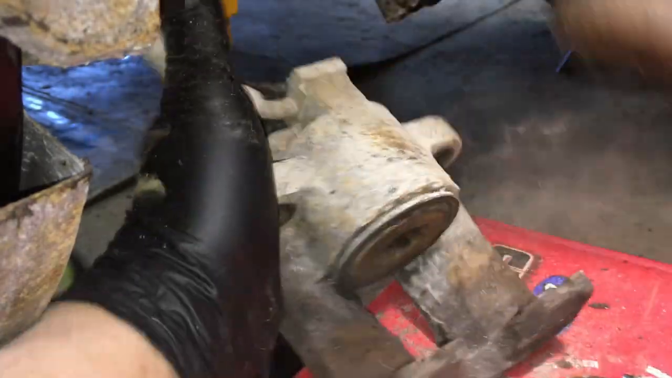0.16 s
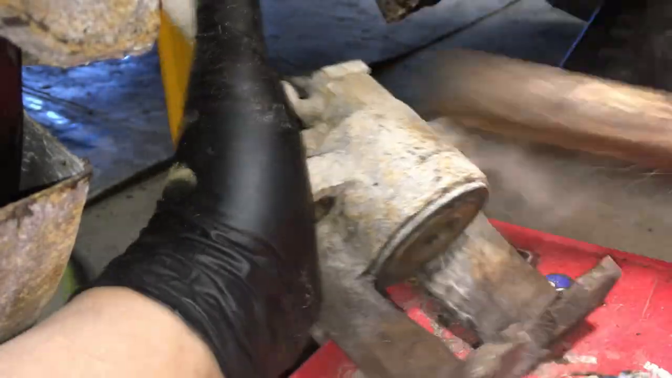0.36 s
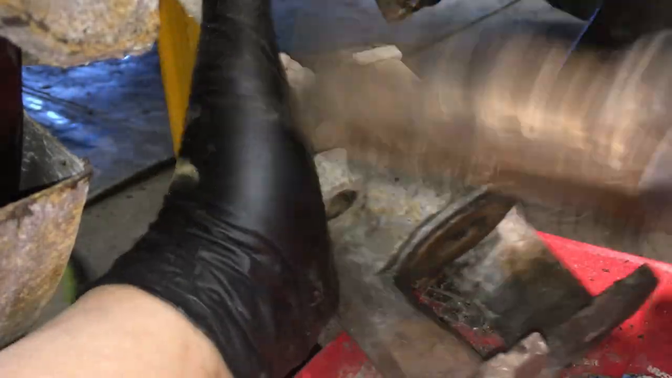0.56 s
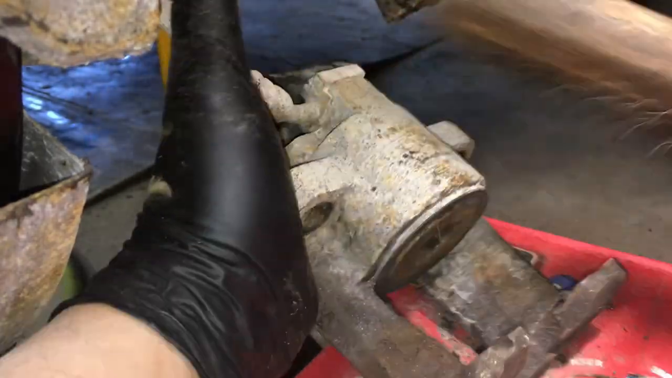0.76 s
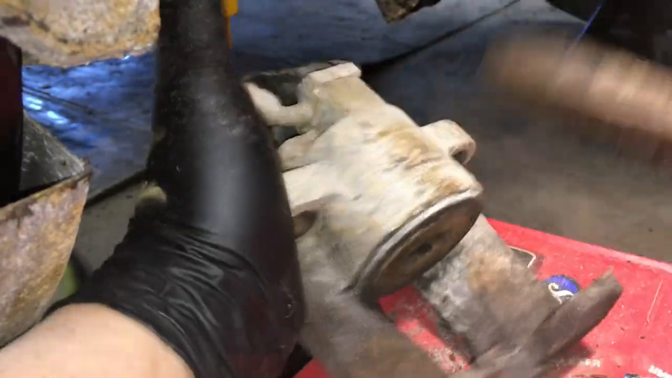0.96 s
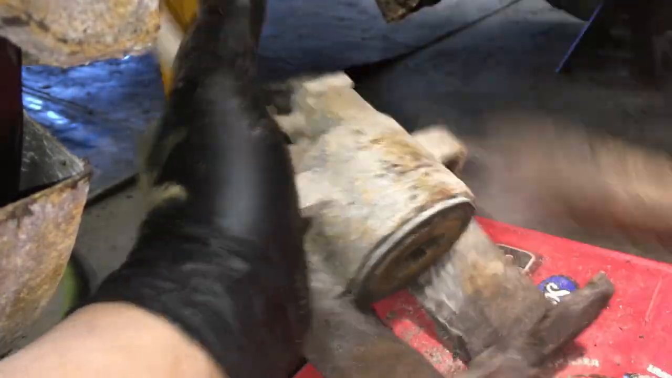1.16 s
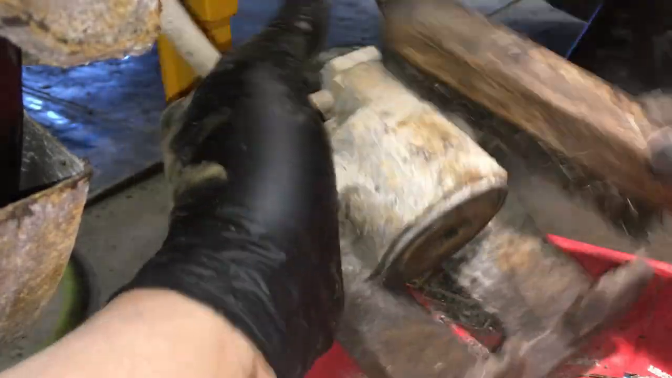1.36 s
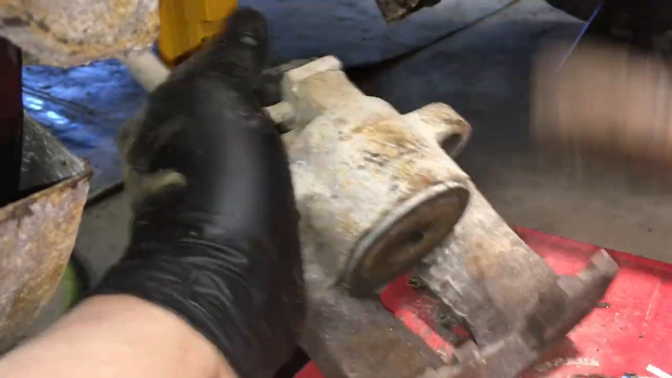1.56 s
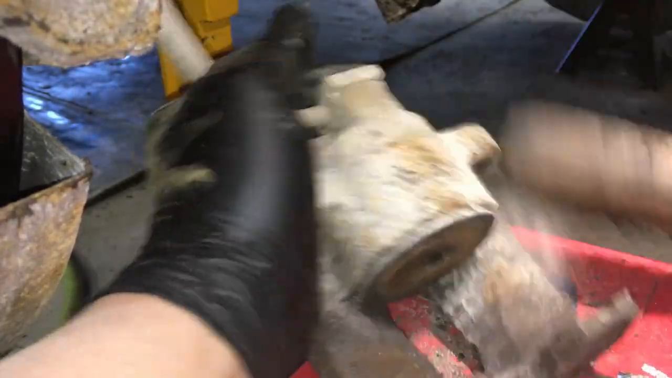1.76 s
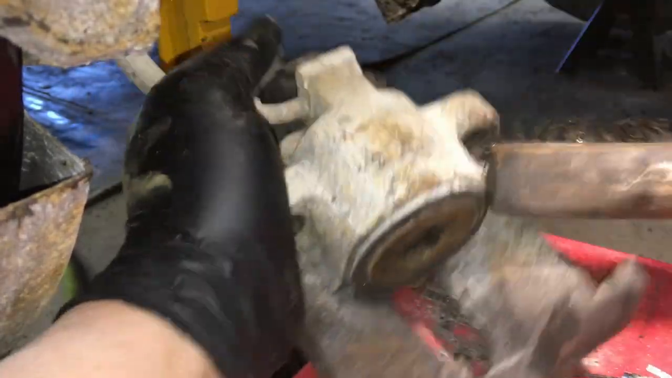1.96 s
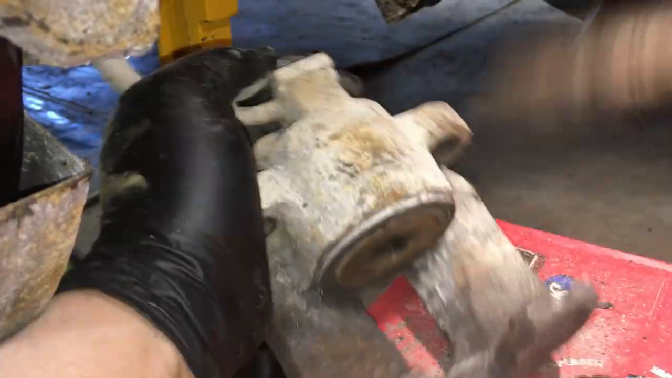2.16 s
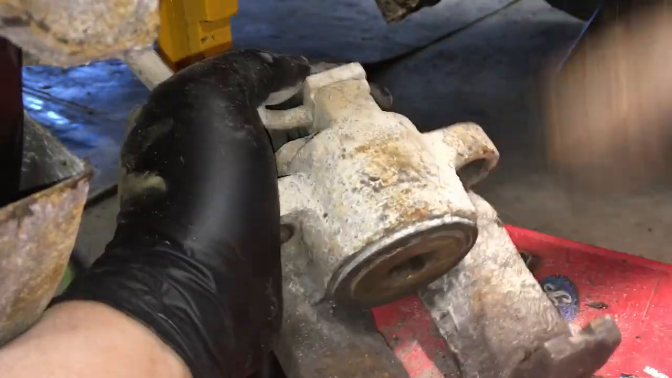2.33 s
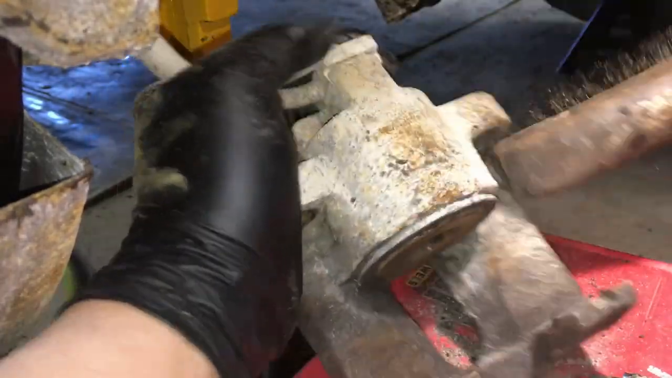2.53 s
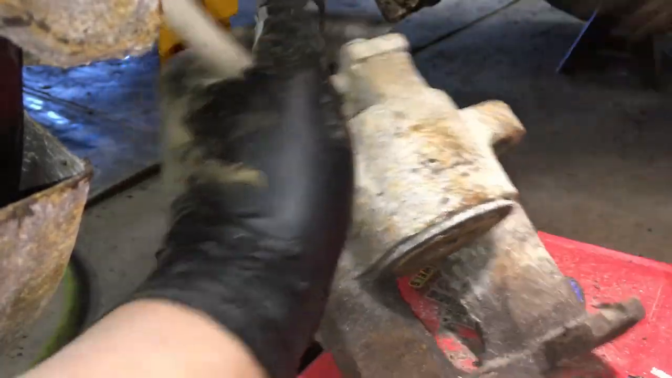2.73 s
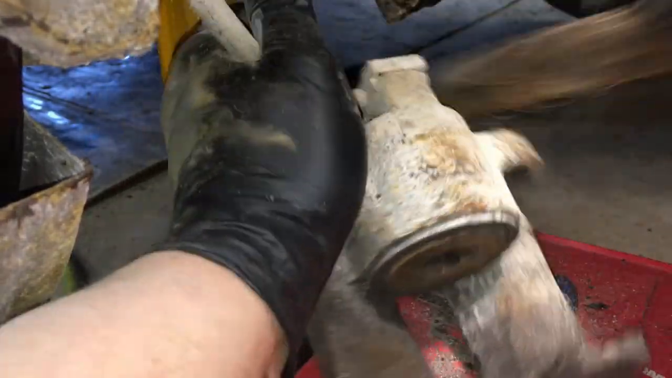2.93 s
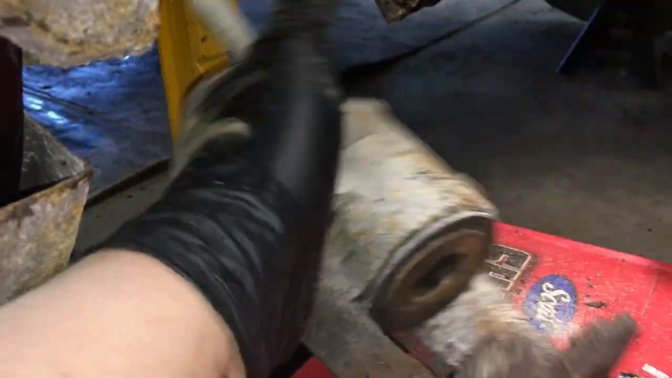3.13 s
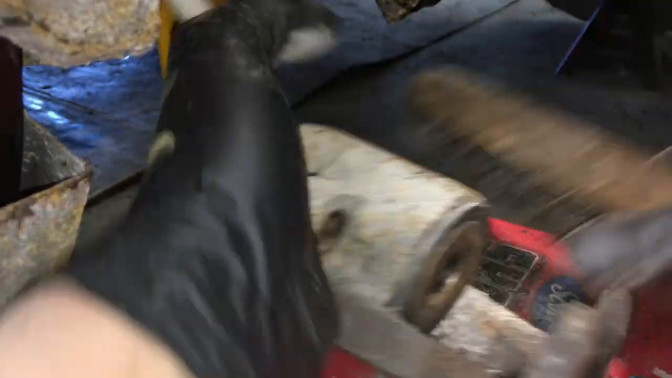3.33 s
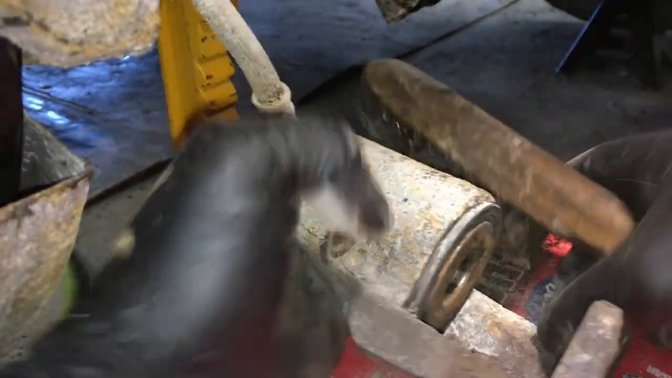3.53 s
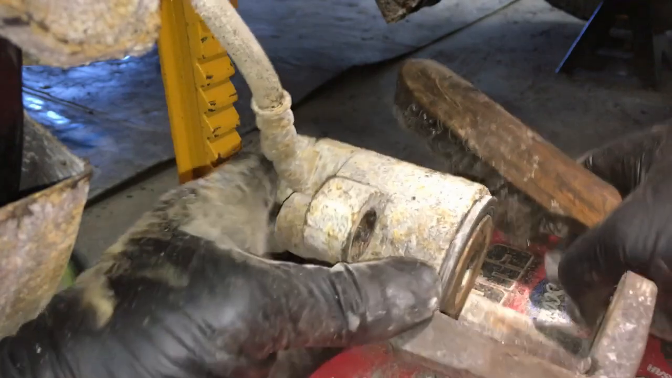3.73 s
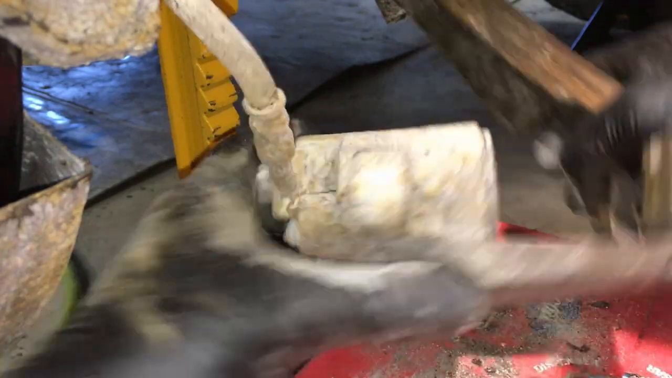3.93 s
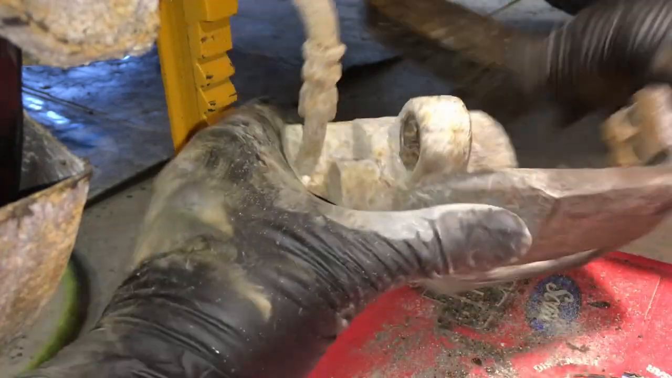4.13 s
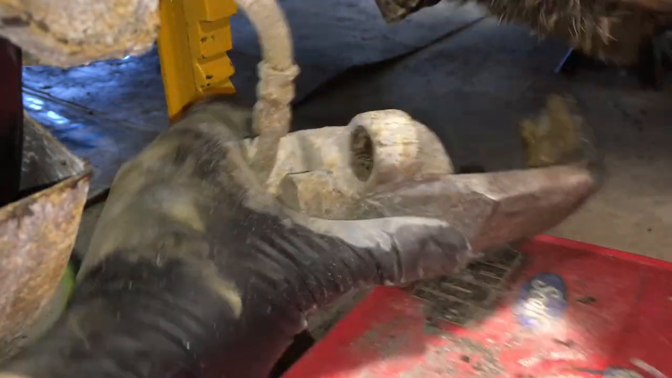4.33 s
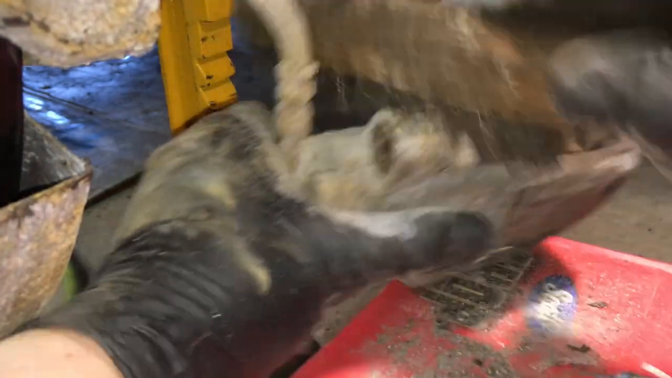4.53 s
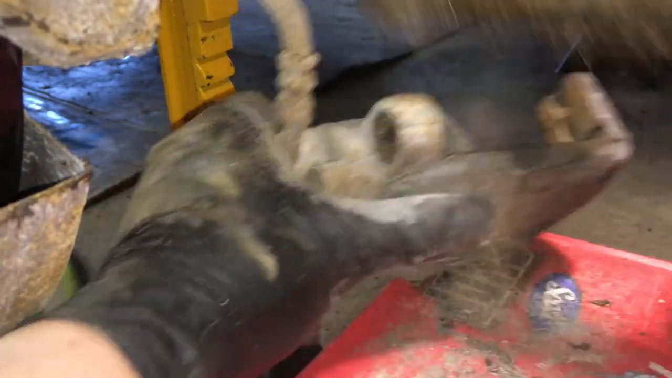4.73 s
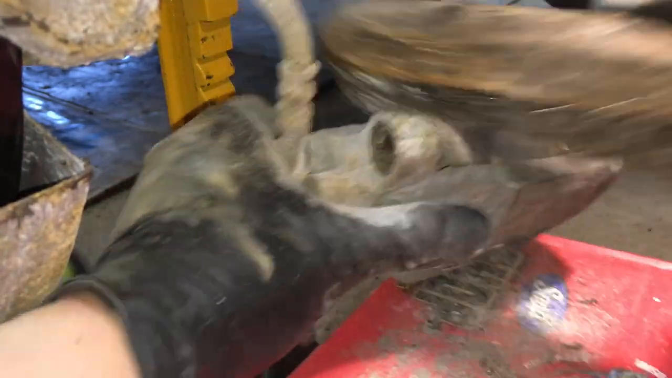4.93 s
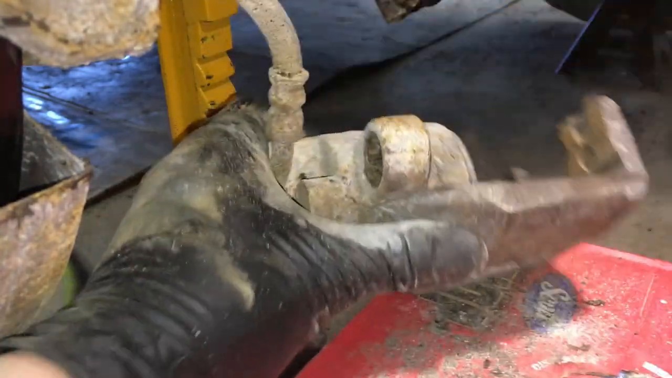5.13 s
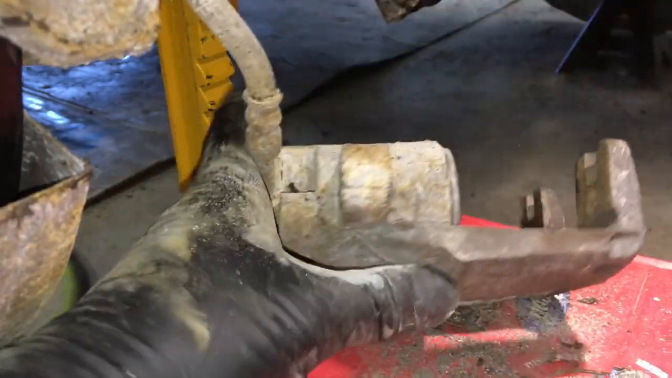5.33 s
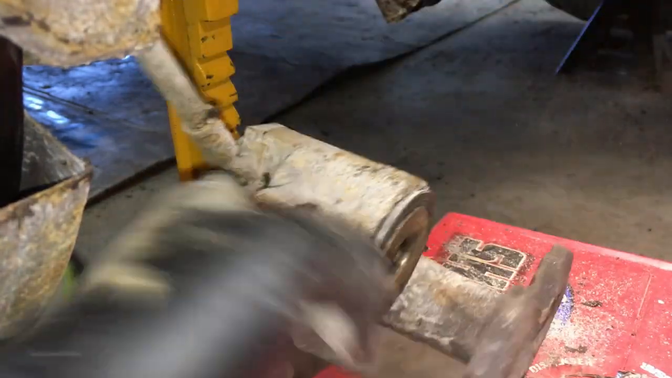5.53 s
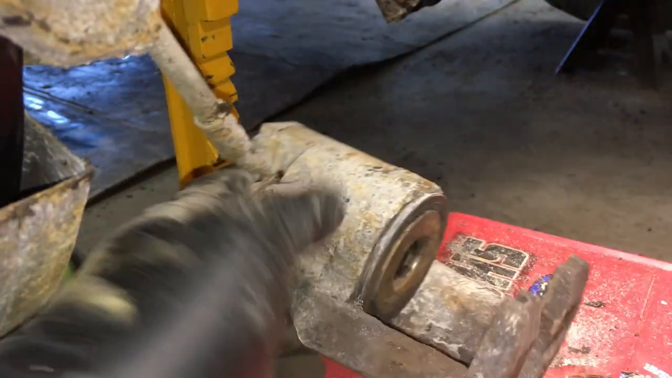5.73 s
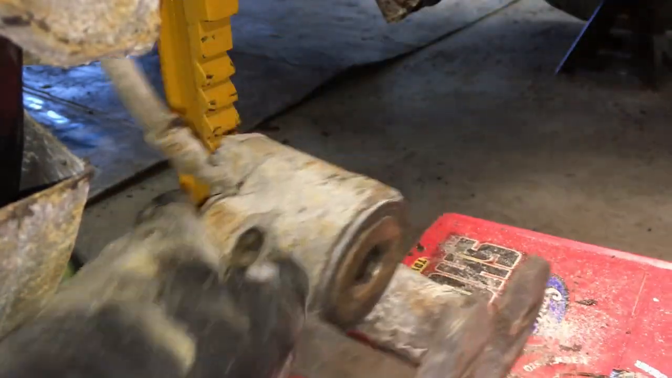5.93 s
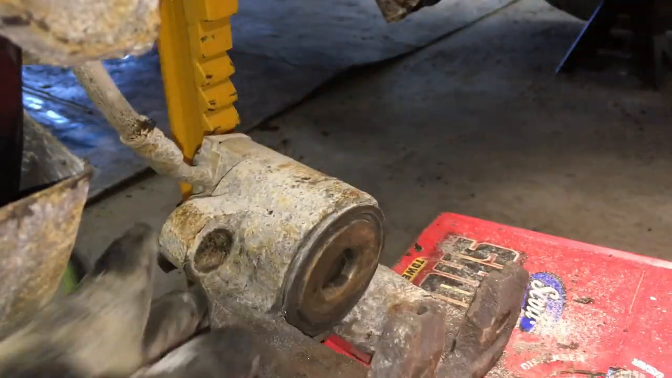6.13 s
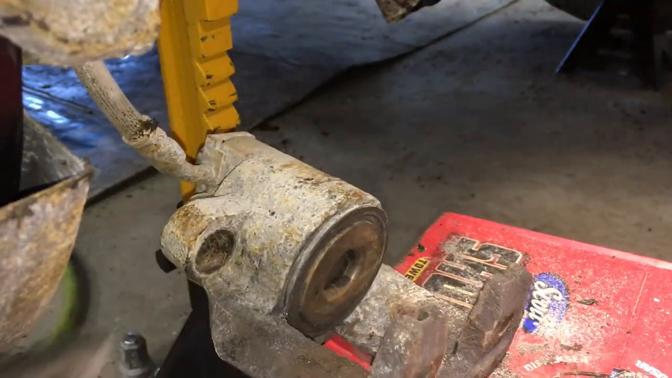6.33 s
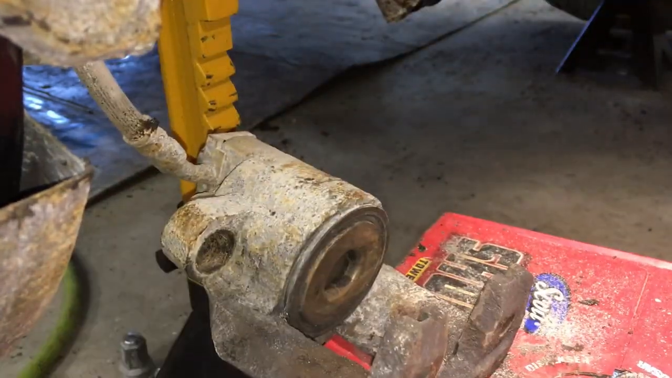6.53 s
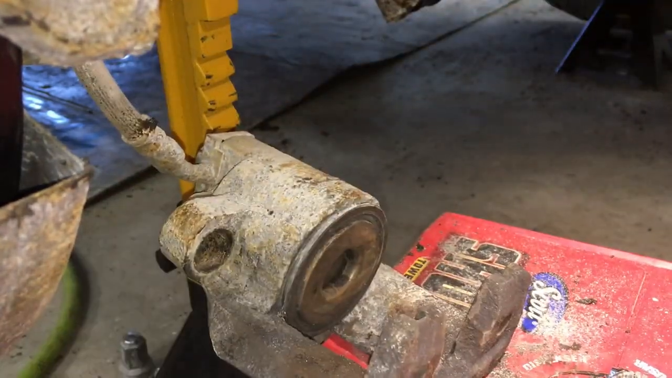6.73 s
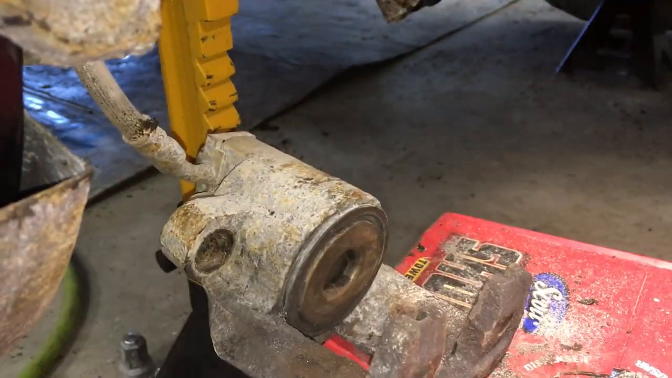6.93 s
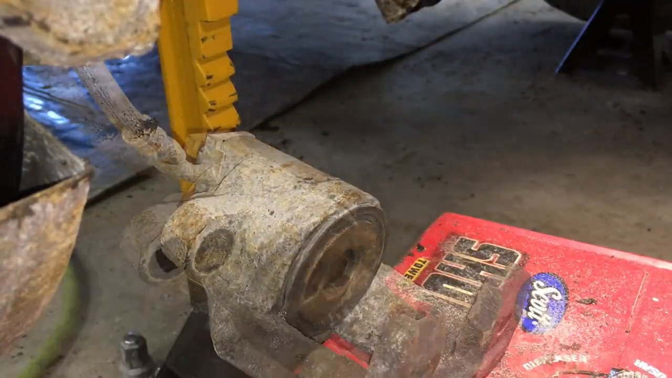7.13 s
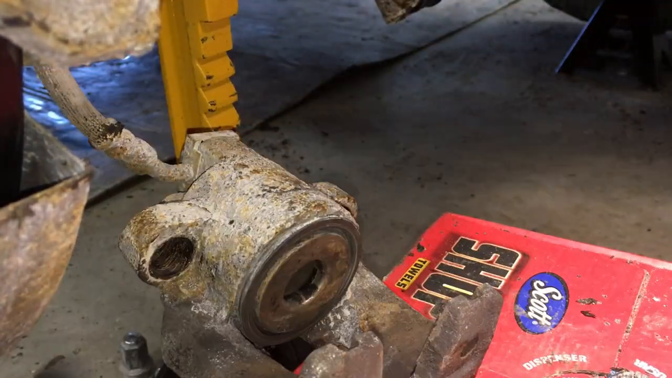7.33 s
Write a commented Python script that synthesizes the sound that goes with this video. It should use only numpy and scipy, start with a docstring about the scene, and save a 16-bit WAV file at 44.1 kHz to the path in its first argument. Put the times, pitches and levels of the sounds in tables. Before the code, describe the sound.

Close by in a garage, a steel wire brush scrubs a rusty brake caliper in quick, uneven strokes. The bristles rasp, snap and zing while the wooden back knocks dully on the metal. A rubber glove turns the part with gritty rubbing and clicks, the brush makes a few more passes, and the glove rubs again before fading. Low handling rumble sits underneath.

```python
"""In a garage, close by, a steel wire brush scrubs a rusty brake caliper that hangs from its hose.
Friction is a train of tiny impacts: bristles rasp, snap and zing over the rust, and the wooden back of
the brush excites the damped modes of the casting. A rubber glove turns the part by stick and slip, the
brush passes again, and the glove handles the part once more, with a faint thin ring under the rubbing.
Low handling rumble on the microphone swells after each knock; the room adds a short reverberation."""
import sys
import numpy as np
from scipy import signal
from scipy.fft import rfft, irfft
from scipy.io import wavfile
from scipy.ndimage import uniform_filter1d

SR = 44100
rng = np.random.default_rng(int(sys.argv[2]) if len(sys.argv) > 2 else 0)


def dump(signal):
    """Clip the signal to [-1, 1] and save it as 16-bit WAV at the path in sys.argv[1]."""
    limited = np.clip(np.atleast_2d(signal).T, -1, 1)
    pcm = np.round(limited * 32767).astype(np.int16)
    wavfile.write(sys.argv[1], SR, pcm)


N = 325308
TIME = np.arange(N) / SR

# blows on the casting: start_s, level_db, centre_hz, t60_factor, clack_db
KNOCKS = [(.237, -12, 158, 0.5, -24.5), (.282, -18, 312, 0.38, -42), (.51, -10.5, 168, 0.1, -43),
          (0.805, -18, 116, 0.2, -40), (.836, -15.5, 166, 0.95, -18), (.952, -17.5, 191, 1, -30),
          (1.025, -19, 300, 0.3, -35.5), (1.053, -14.5, 140, 0.3, -36), (1.074, -21.5, 315, .85, -28.5),
          (1.322, -21, 105, 0.31, -53.5), (1.378, -16, 100, 1, -31.5), (1.628, -7, 162, 0.55, -20),
          (1.725, -21, 104, 0.19, -52), (1.856, -19, 103, 0.19, -30), (1.942, -11.5, 146, 0.58, -35),
          (2.126, -24.5, 140, 0.1, -51), (2.217, -8, 264, 0.25, -25), (2.275, -19.5, 191, 0.95, -38.5),
          (2.394, -20, 310, 1, -46), (2.668, -12.5, 244, 0.78, -40), (2.742, -20, 150, 1, -42),
          (3.172, -20.5, 181, 1, -27), (3.378, -25, 220, 0.34, -42), (3.43, -26, 320, 1, -54),
          (4.38, -20.5, 410, 0.36, -28.5), (4.386, -16, 613, 0.77, -22), (4.414, -22, 729, 1, -45),
          (4.723, -28, 250, 0.79, -24), (4.894, -29, 326, 0.88, -37), (5.105, -22, 291, 0.74, -28),
          (5.541, -27, 317, .64, -54), (5.886, -26, 306, 1, -51)]


def brush(shudder_db=-2, catch_db=-6, gain_db=2):
    """Friction noise: wire tips flick over rust, pits hook single wires, digging shakes the casting."""
    # passes of the brush: start_s, length_s, scrape_db, rasp_db, sheen_db (last two against the scrape)
    strokes = [(.012, 0.059, -31.5, -8, 0), (.095, 0.059, -33, -7.5, -1), (.205, 0.11, -30, -6.5, -2.5),
               (.402, 0.093, -37, -2.5, -2.5), (.52, 0.11, -35.5, -4, -3), (.652, 0.05, -38.5, 0.5, -2),
               (.789, 0.027, -20.5, -21, -1), (.82, 0.045, -33, -5, -4.5), (.949, 0.043, -35, -0.5, -2),
               (1.062, 0.044, -31.5, -10, -3), (1.182, 0.02, -45, 4, -7), (1.279, 0.065, -33, -5, -3.5),
               (1.362, 0.02, -18.5, -5, -5), (1.463, 0.065, -37.5, -1, -2.5), (1.572, 0.09, -32, -14.5, -4),
               (1.855, 0.098, -36.5, -10.5, -4), (1.936, 0.017, -28.5, -5.5, -1.5),
               (2.006, 0.011, -42.5, -4.5, -7), (2.126, .07, -46.5, -16, -5), (2.212, 0.0094, -30, -5.5, 0),
               (2.275, 0.092, -38.5, -6.5, -2.5), (2.383, 0.049, -27.5, -11.5, -1),
               (2.597, 0.088, -33, -9.5, -3), (2.656, 0.021, -28, 0.5, 2), (2.72, 0.029, -35.5, -3, -6),
               (4.595, 0.037, -43.5, 7.5, -6), (4.707, 0.12, -31.5, -6.5, -3.5),
               (4.887, 0.048, -42, -3, -4.5), (5.075, 0.098, -35, -9, -4.5)]
    # spans in which stray wires trail on the part: start_s, end_s
    trailing = [(0, 2.6), (4.53, 5.2)]
    # balance of the trailing wires: scrape_db, rasp_db, sheen_db
    trail_levels = (-52.5, 0, -5)
    # spectrum of wire on rust: frequency_hz, density_db
    wire_spectrum = [(60,-35),(100,-1),(165,-17.5),(210,-5.5),(300,-4),(440,-8),(560,-6.5),(800,-5),(1080,-4.5),(1750,-9.5),(2190,-9),(2700,-15),(3550,-12),(4900,-16.5),(7000,-14.5),(13000,-17),(16000,-23)]
    passes = list(strokes) + [(start, end - start, *trail_levels) for start, end in trailing]
    tips = slips(per_s=16000, spread_db=2, clump_db=2.24, clump_hz=140, ring_s=0.00061)
    catches = slips(per_s=220, spread_db=3.5, clump_db=2, clump_hz=25, ring_s=0.00025, count=12)
    contacts = tips + amp(catch_db) * band(catches, 1800, "highpass")
    bristles = shimmer(colour(contacts, wire_spectrum), depth_db=2.5)
    levels = [(db + gain_db, rasp, sheen, rasp + shudder_db) for _, _, db, rasp, sheen in passes]
    return registers(bristles, [stroke(*row[:2]) for row in passes], levels)


def zings(pitch_spread=0.11, gain_db=-7, ring_s=0.004, release_s=0.0196, count=24):
    """Free vibration: wires of nearly one length are plucked in turn, each ringing at its own pitch."""
    # bunches of wires that spring free: start_s, level_db, pitch_hz
    bunches = [(0.5388, -14.5, 3340), (1.049, -16, 3440), (1.3254, -23.5, 3340), (1.587, -19, 3610),
               (1.8694, -14, 3360), (1.917, -20, 3220), (2.179, -14.5, 3670), (2.6409, -13, 2550),
               (2.8479, -27, 2320), (2.8913, -26, 2280), (3.032, -19, 3930), (4.7212, -13.5, 3770),
               (4.7664, -19, 3420), (5.068, -18.5, 3680), (5.0971, -12.5, 3640)]
    out, t = np.zeros(N), TIME[:SR // 8]
    for start, db, hz in bunches:
        pitch = hz * (1 + pitch_spread * rng.standard_normal((count, 1)))
        age = np.maximum(t - np.linspace(0, release_s, count)[:, None], 0)
        wires = (np.exp(-age / ring_s) * np.sin(2 * np.pi * pitch * age)).sum(0)
        add(out, start, amp(db + gain_db) * wires / np.sqrt(count))
    return out


def snaps(crack_s=0.0004, chatter_s=0.0063, chatter_db=-17):
    """Impulsive release: a caught bristle cracks and chatters; coarse grit adds a duller tick."""
    # bristles and grit that catch and let go: start_s, crack_db, tick_db
    releases = [(.0205, 3, -28), (0.04, 5, -26), (0.0482, -9, -16), (0.0572, 7.5, -8), (0.0972, 7.5, -12),
                (0.1332, -2, -11), (0.1465, -3.5, -9), (0.1984, -4, -9), (0.203, 8.5, -4.5), (0.2544, 1, 3),
                (.406, -3, -23), (0.4818, -5.5, -23), (0.5098, 4, -4.5), (0.6587, 1, -8), (0.8056, 6, -13),
                (.9548, -0.5, -13), (1.05, -6, -6.5), (1.076, 2, 3), (1.2814, -8, -12), (1.3714, 8, 7),
                (1.4729, 1, -13), (1.505, 0, -22), (1.854, -6.5, -8.5), (2.2175, -0.5, -8),
                (2.303, 1.5, -6), (2.4155, -1.5, -21), (2.6628, 2, -4), (2.7473, 6.5, -13),
                (2.826, -1, -14.5), (3.1114, -6, 5.5), (3.1732, 1, -3), (3.2137, 0.5, -5),
                (3.254, -10, -28), (3.2793, 2.5, -8), (3.337, 12.5, 8), (3.3772, 7, 4), (3.406, 2, -24),
                (3.432, -6.5, -6.5), (3.7336, -3.5, -5), (3.916, 3.5, -1), (4.301, -14.5, -36),
                (4.846, 1.5, -13), (4.8613, -3, -16), (4.895, -2, -11.5), (5.0426, 1, -9), (5.28, -8.5, -8),
                (5.452, 0, 1), (5.5443, -1, -2), (5.6915, 10.5, 2), (5.757, 1.5, -15), (5.889, -1, -10),
                (5.9388, -1, -15), (6.0184, -1.5, -15), (6.039, 4.5, -3), (6.1372, 7.5, -9.5),
                (6.3634, -8, -30), (6.3925, -22, -21), (6.6467, -21, -22.5)]
    # spectrum of a snap: frequency_hz, density_db
    snap_spectrum = [(100,-16),(300,-6),(700,-5),(1500,-3),(2200,0),(2800,-3),(3500,0),(5000,-3),(7500,0),(10500,-2),(12500,0),(16000,1)]
    out, t = np.zeros(N), TIME[:1024]
    decay = np.exp(-t / crack_s) + amp(chatter_db) * np.exp(-t / chatter_s)
    noises = rng.choice([-1., 1.], (len(releases), len(t)))
    for (start, crack_db, tick_db), noise in zip(releases, noises):
        burst = colour(noise * decay, snap_spectrum)
        crack = amp(crack_db) * unit(band(burst, 2400, "highpass"))
        tick = amp(tick_db) * unit(band(burst, 3340, "lowpass"))
        add(out, start + 0.00035, (crack + tick) / np.sqrt(len(t)))
    return out


def knocks(reach_octaves=0.96, clack_s=0.0049, clack_gain_db=5, thud_gain_db=-1):
    """Modal response: each blow rings the modes near its centre frequency, under a wooden clack."""
    # modes of the hand-held casting: frequency_hz, level_db, t60_s
    casting_modes = [(59.6,2.5,0.24),(93.5,2.5,0.042),(116,-8.5,0.24),(169,1,0.12),(216,-8,0.25),(242.6,-6,0.091),(312,0,0.17),(431,-6,0.14),(481,-4.5,0.12),(575,-0.5,0.089),(753,-1.5,0.12),(890,-19,0.053),(1153,-4.5,0.043),(1390,-35,.05),(2190,-24,.07)]
    # spectrum of wood striking iron: frequency_hz, density_db
    clack_spectrum = [(100,-15),(450,-6),(700,-6),(1050,1.5),(1600,-13.5),(2200,-21),(3000,-17.5),(8000,-27)]
    out, t = np.zeros(N), TIME[:SR // 3]
    hz, mode_db, t60 = np.transpose(casting_modes)[:, :, None]
    polarity = (-1) ** np.arange(len(hz))[:, None]
    for start, db, centre_hz, t60_factor, clack_db in KNOCKS:
        weight = amp(mode_db) / (1 + (np.log2(hz / centre_hz) / reach_octaves) ** 4)
        tuned = hz * (1 + 0.015 * rng.standard_normal(hz.shape))  # the grip shifts the modes a little
        decay = amp(-60 * t / (t60 * t60_factor))
        thud = (polarity * weight * decay * np.sin(2 * np.pi * tuned * t)).sum(0)
        thud *= 1 + 0.206 * np.exp(-t / 0.0019)  # the first swings of each blow stand out a little louder
        thud /= abs(thud).max()
        clack = unit(colour(rng.standard_normal(len(t)), clack_spectrum)) * np.exp(-t / clack_s)
        add(out, start, amp(db + thud_gain_db) * thud + amp(clack_db + clack_gain_db) * clack)
    return out


def glove(hollow_hz=2340, crush_db=-43, crumb_db=-7, gain_db=6):
    """Stick-slip friction: gritty rubber drags on the casting, and hard rubs crush crumbs of rust."""
    # shifts of the grip: peak_s, swell_s, fade_s, scrape_db, rasp_db, sheen_db, shudder_db
    rubs = [(2.965, 0.026, 0.04, -36, -4, -1.5, -10.5), (3.108, 0.043, 0.071, -31.5, -2, -3, -4),
            (3.17, 0.059, 0.019, -41.5, 4.5, -1.5, -7), (3.365, 0.065, 0.053, -34.5, -3, -4, -1),
            (3.52, 0.018, 0.043, -29.5, -4, -3.5, -14.5), (3.70, 0.049, 0.043, -43, -6, -4, -5),
            (3.898, 0.039, 0.03, -36, -7.5, -5, -10), (4.095, 0.027, 0.05, -47.5, -26, -2.5, -23),
            (4.19, 0.013, 0.033, -58, 6, -14, -20), (4.285, 0.032, 0.024, -50, -9, -3, -14),
            (4.413, 0.023, 0.036, -39.5, 2, -4, -11.5), (5.362, 0.033, 0.029, -34.5, 2, -5, 2),
            (5.695, 0.079, 0.082, -31.5, -5.5, -3, -7.5), (5.90, 0.022, .045, -34.5, -7, -3.5, -3.5),
            (6.079, 0.035, 0.11, -27.5, -7, -5.5, -9.5), (6.16, 0.017, 0.041, -31.5, -9.5, -6, -12),
            (6.42, 0.26, 0.086, -49, -8.5, -4, -36), (6.72, 0.096, 0.066, -60.5, -2, -8, -13),
            (6.90, 0.018, 0.03, -66, 3.5, -6, -3.5), (7.2, 0.037, 0.12, -67.5, 1.5, -7, -11),
            (7.37, 0.046, .05, -55.5, 8, -7, 5)]
    # spans in which the glove creeps on the part: start_s, end_s
    holding = [(2.798, 4.33), (4.448, 4.62), (5.25, 6.5)]
    # balance of that creep: scrape_db, rasp_db, sheen_db, shudder_db
    creep_levels = (-57, -1.5, -7, -9.5)
    # spectrum of rubber on rust: frequency_hz, density_db
    rubber_spectrum = [(80,-24.5),(168,4),(215,2),(305,5),(420,-9),(620,-11),(850,-11),(1250,-7),(1750,-12.5),(2190,-11),(2750,-16),(3300,-6.5),(4900,-6),(6200,-3.5),(10500,-13.5),(12400,-10),(16000,-18.5)]
    envelopes = [rub(*row[:3]) for row in rubs] + [stroke(start, end - start) for start, end in holding]
    levels = np.array([row[3:] for row in rubs] + [creep_levels] * len(holding))
    crush = np.minimum(amp(levels[:, 0] - crush_db) @ np.array(envelopes), 1)
    grit = slips(per_s=11000, spread_db=3, clump_db=3, clump_hz=151.6, ring_s=0.00028)
    grit = shimmer(colour(grit, rubber_spectrum), depth_db=2.33)
    hollow = shimmer(grit, depth_db=4, size=1024)  # the casting's resonances shift under the grip
    grit = band(hollow, hollow_hz, "lowpass") + band(grit, hollow_hz, "highpass")
    crumbs = slips(per_s=150, spread_db=7.5, clump_db=0.5, clump_hz=22, ring_s=0.0002, count=12)
    crumbs = band(colour(crumbs, rubber_spectrum), 2500, "highpass")
    return amp(gain_db) * registers(grit + amp(crumb_db) * crush * crumbs, envelopes, levels)


def thin_ring(start_s=5.1, end_s=6.59, fade_s=0.09, gain_db=6):
    """Inharmonic partials: a faint ring under the rubbing wavers in pitch and flutters in level."""
    # partials of the ring: pitch_hz, level_db
    partials = [(446.8, -57.5), (866.7, -68), (1050, -67), (1330, -65), (2062, -70)]
    swell = np.clip(np.minimum(TIME - start_s, end_s - TIME) / fade_s, 0, 1)
    warped_time = np.cumsum(1 + 0.005 * wander(45)) / SR
    ring = sum(amp(db + 2.5 * wander(6.7)) * np.sin(2 * np.pi * hz * warped_time) for hz, db in partials)
    return amp(gain_db) * swell * ring


def handling_rumble(jolt_db=-21.5, jolt_s=0.036):
    """Structure-borne noise: a hand shakes the microphone; the low rumble swells after each knock."""
    # strength of the rumble: time_s, level_db
    rumble_levels = [(0, -41), (2.3, -45), (2.6, -55), (3.8, -47), (4.25, -77), (4.65, -45.5),
                     (5.15, -43.5), (5.45, -60), (6.1, -51), (6.9, -66), (7.38, -54.5)]
    # spectrum of the rumble: frequency_hz, density_db
    rumble_spectrum = [(15,-27),(28,-28),(40,-3),(54,-5.5),(80,-2.5),(110,-10.5),(200,-11),(320,-13.5),(600,-29),(2000,-117)]
    envelope = amp(np.interp(TIME, *np.transpose(rumble_levels)))
    for start, db, *_ in KNOCKS:
        add(envelope, start, amp(db + jolt_db) * np.exp(-TIME[:SR] / jolt_s))
    return envelope * unit(colour(rng.standard_normal(N), rumble_spectrum))


def garage(x, tail_db=-15, tail_side_db=-8, early_db=-13.5, early_s=0.005):
    """Reverberation: early reflections off floor and car, then a diffuse tail; gives middle and side."""
    # reverberation time of the room: frequency_hz, t60_s
    decay_times = [(100, 0.38), (500, 0.26), (1400, 0.16), (3700, 0.25), (9700, 0.08), (16000, 0.42)]
    # side against middle in the echoes: frequency_hz, gain_db
    width = [(60, -22), (200, -17), (600, -9), (2000, -7), (5000, -4.5), (16000, -4.5)]
    t = TIME[:SR * 2 // 3]
    hz, age, spectra = signal.stft(rng.standard_normal((2, len(t))), SR, nperseg=256)
    decay = amp(-60 * age / read(decay_times, hz)[:, None])
    tail = signal.istft(spectra * decay, SR, nperseg=256)[1][:, :len(t)]
    tail *= np.clip(t / 0.015, 0, 1)
    reflections = rng.choice([-1., 1.], tail.shape) * (rng.random(tail.shape) < 0.15)
    early = reflections * np.exp(-t / early_s) * (t > 0.001)
    response = amp([[tail_db], [tail_db + tail_side_db]]) * unit(tail) + amp(early_db) * unit(early)
    middle, side = signal.fftconvolve(x[None], response / np.sqrt(len(t)), axes=1)[:, :N]
    return middle, colour(side, width)


def still_air(level_db=-56):
    """Ambient noise: a steady random background, strongest in the bass."""
    # spectrum of the garage's still air: frequency_hz, density_db
    air_spectrum = [(15,-48.5),(30,-23),(54,1.5),(80,-5),(120,-8),(200,-18),(310,-20),(500,-28),(1200,-28.5),(2200,-26),(6000,-34.5),(13000,-40),(16000,-50)]
    return amp(level_db) * unit(colour(rng.standard_normal(N), air_spectrum))


def slips(per_s, spread_db, clump_db, clump_hz, ring_s, count=24):
    """Shot noise: tiny contacts, each with its own brief ring, slip in clumps; a few slips are large."""
    size = amp(spread_db * np.minimum(rng.exponential(1, N), 4)) * rng.choice([-1, 1], N)
    impulses = size * (rng.random(N) < per_s / SR) * amp(clump_db * wander(clump_hz))
    contact, t = rng.integers(0, count, N), TIME[:512]
    rings = rng.standard_normal((count, len(t))) * np.exp(-t / ring_s)
    ringing = (signal.oaconvolve(impulses * (contact == k), unit(rings[k]))[:N] for k in range(count))
    return unit(sum(ringing))


def registers(x, envelopes, levels, sheen_hz=9000):
    """Power summation: each gesture adds its own balance of shudder, rasp, hiss and sheen to a scrape."""
    scrape, rasp, sheen, shudder = amp(levels).T
    sheen = np.clip(sheen, 0.1, 0.93)
    hiss = np.sqrt(1 - sheen ** 2)
    parts = [(band(x, 480, "lowpass"), shudder), (band(x, [480, 2750], "bandpass"), rasp),
             (band(x, [2750, sheen_hz], "bandpass"), hiss), (band(x, sheen_hz, "highpass"), sheen)]
    power = np.square(envelopes)
    return sum(unit(part) * np.sqrt((scrape * gain) ** 2 @ power) for part, gain in parts)


def shimmer(x, depth_db, size=256):
    """Spectral modulation: as contacts come and go, patches of the spectrum swell and fade."""
    spectra = signal.stft(x, nperseg=size)[2]
    patches = uniform_filter1d(rng.standard_normal(spectra.shape), size=5, axis=0)
    patches = unit(uniform_filter1d(patches, size=7, axis=1))
    return signal.istft(spectra * amp(depth_db * patches), nperseg=size)[1][:N]


def stroke(start_s, length_s, bite_s=0.008, lift_s=0.013, lean_db=1):
    """Contact force envelope: the surfaces bite, the hand leans in towards mid-pass, then lifts off."""
    age = TIME - start_s
    lean = amp(lean_db * (np.sin(np.pi * np.clip(age / length_s, 0, 1)) - 2 / np.pi))
    return np.clip(age / bite_s, 0, 1) * lean * np.exp(-np.clip((age - length_s) / lift_s, 0, 20))


def rub(peak_s, swell_s, fade_s, roundness=1.25):
    """Grip force envelope: the hand tightens to its hardest rub and eases off."""
    away = np.maximum((peak_s - TIME) / swell_s, (TIME - peak_s) / fade_s)
    return np.exp(-np.minimum(away ** roundness, 20))


def wander(rate_hz):
    """Random fluctuation: low-passed noise of rms 1."""
    rolloff = 1 + (np.fft.rfftfreq(N, 1 / SR) / rate_hz) ** 4
    return unit(irfft(rfft(rng.standard_normal(N)) / rolloff, N))


def colour(x, points, size=4096):
    """Minimum-phase filter: imposes a spectrum causally, so attacks stay sharp."""
    log_gain = np.log(amp(read(points, abs(np.fft.fftfreq(size, 1 / SR)))))
    taps = np.fft.ifft(np.exp(np.conj(signal.hilbert(log_gain)))).real[:size // 2]
    return signal.oaconvolve(x, taps)[:len(x)]


def band(x, hz, kind):
    """Maximally flat filter of third order."""
    return signal.sosfilt(signal.butter(3, hz, kind, fs=SR, output="sos"), x)


def read(points, hz):
    """Interpolation of (frequency_hz, value) points on a logarithmic frequency axis."""
    frequency, value = np.transpose(points)
    return np.interp(np.log(hz + 1), np.log(frequency + 1), value)


def add(mix, start_s, sound):
    """Superposition of a sound on the mix."""
    part = mix[max(round(start_s * SR), 0):][:len(sound)]
    part += sound[:len(part)]


def amp(db):
    """Decibels to amplitude ratio."""
    return 10 ** (np.asarray(db) / 20)


def unit(x):
    """Normalisation to rms 1."""
    return x / np.sqrt(np.mean(x ** 2) + 1e-20)


def scene(gain_db=-4.5):
    """Direct and reverberant fields: the work is straight ahead; only the echoes spread to the sides."""
    direct = brush() + zings() + glove() + snaps() + knocks() + handling_rumble() + thin_ring()
    echoes, side = garage(direct)
    middle = direct + echoes + still_air()
    return amp(gain_db) * np.array([middle + side, middle - side])


def record(dry, low_cut_hz=31, ceiling=0.7, high_cut_hz=16050):
    """Band limiting and saturation: the microphone sheds deep bass, peaks round off, top treble is cut."""
    rounded = ceiling * np.tanh(band(dry, low_cut_hz, "highpass") / ceiling)
    lowpass = signal.firwin(255, high_cut_hz, window=("kaiser", 8), fs=SR)
    return signal.oaconvolve(rounded, lowpass[None], "same", axes=1)


dry = scene()
out = record(dry)
dump(out)
```